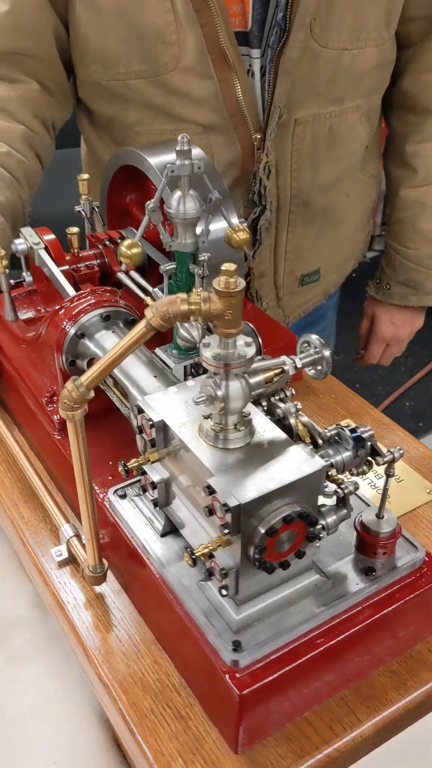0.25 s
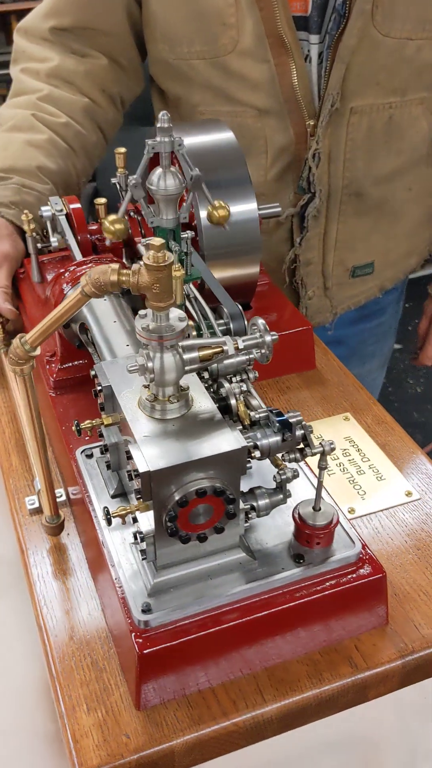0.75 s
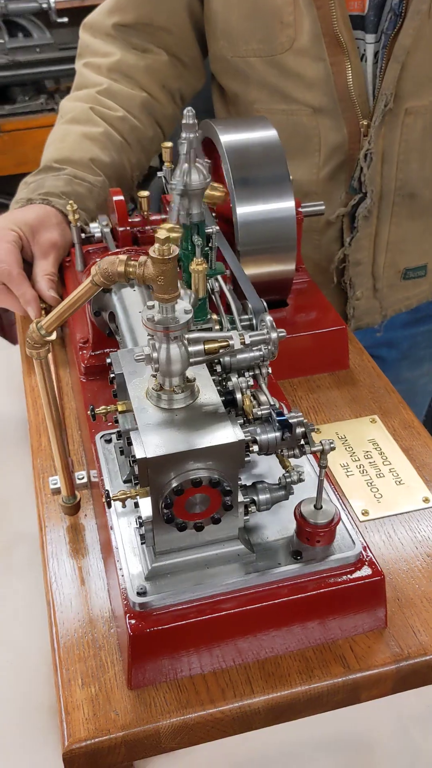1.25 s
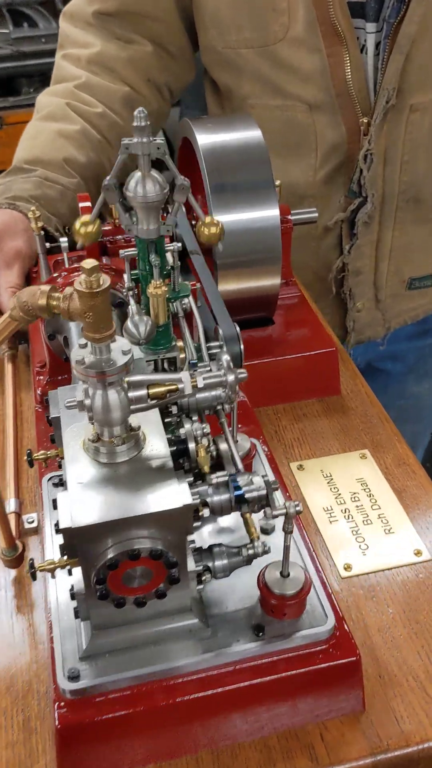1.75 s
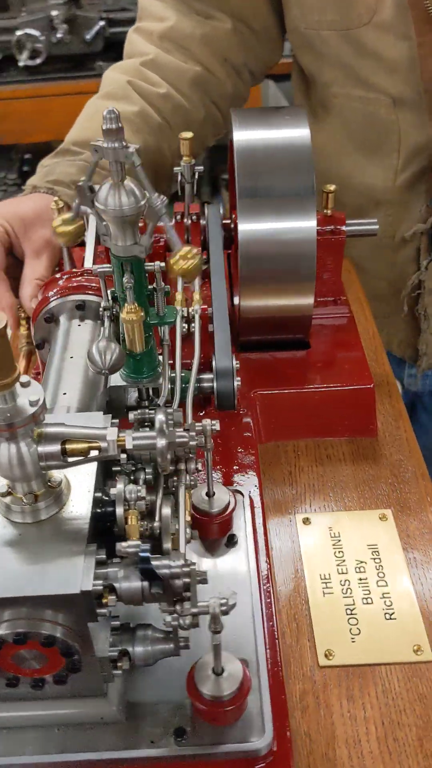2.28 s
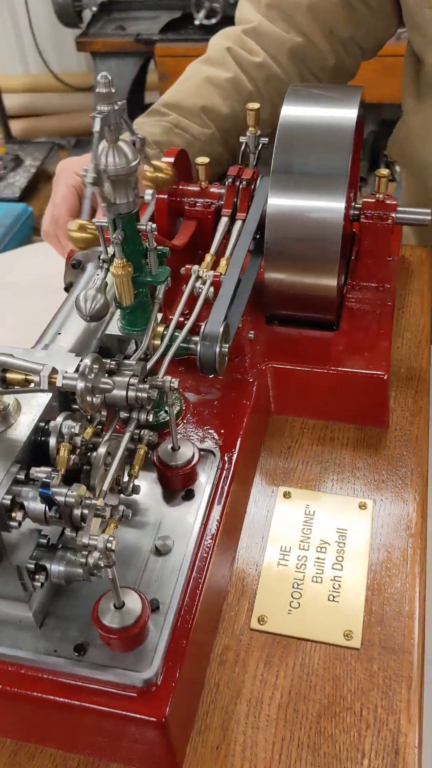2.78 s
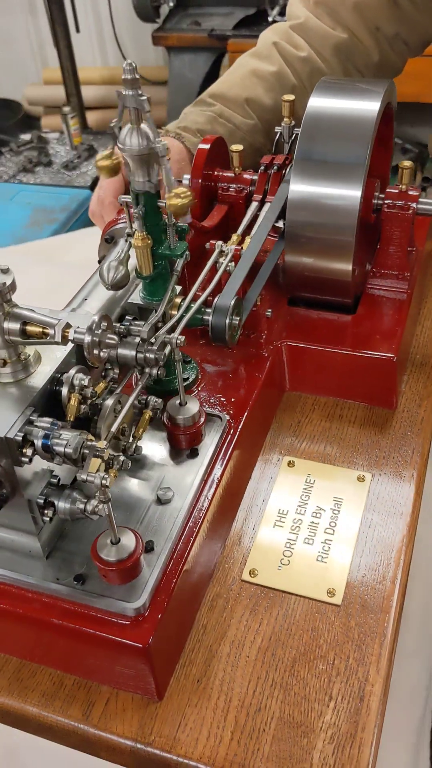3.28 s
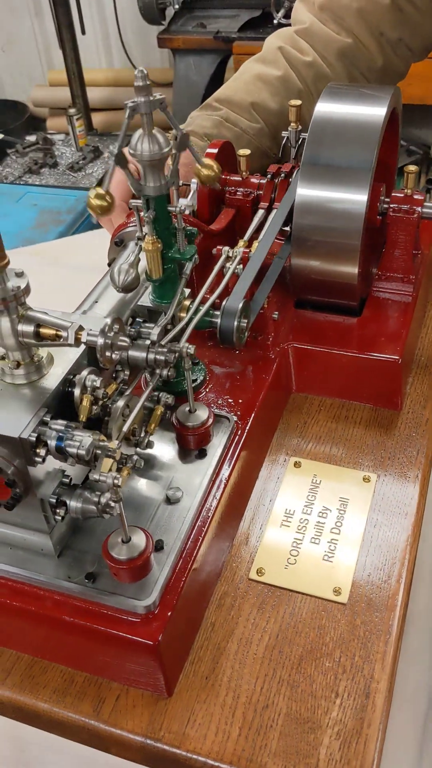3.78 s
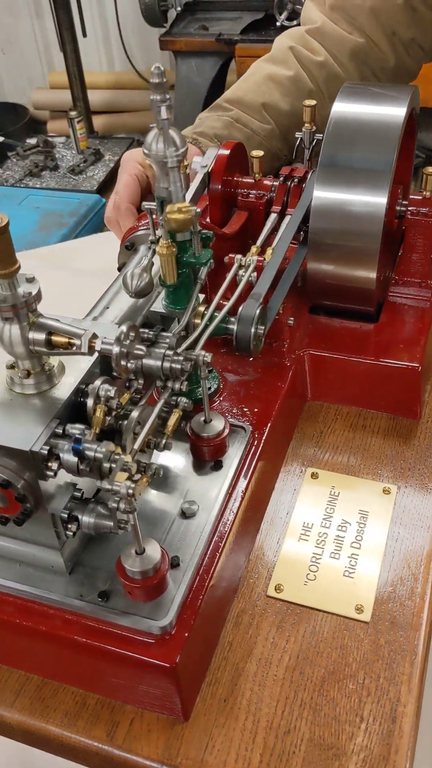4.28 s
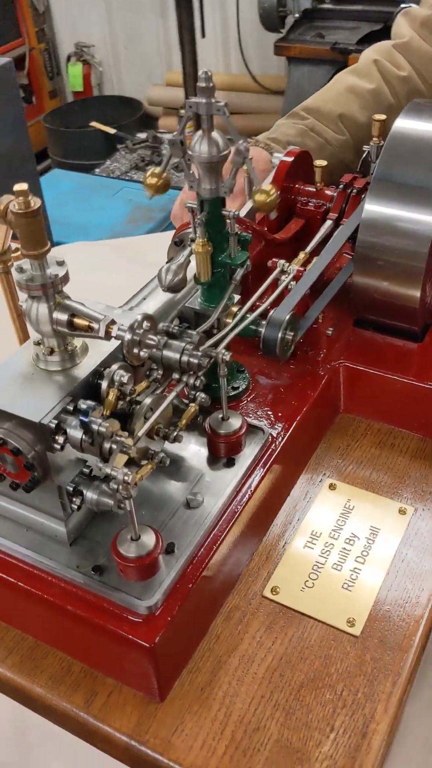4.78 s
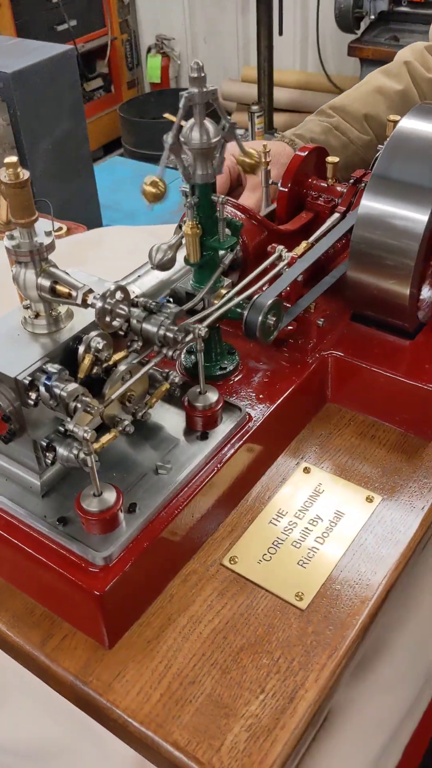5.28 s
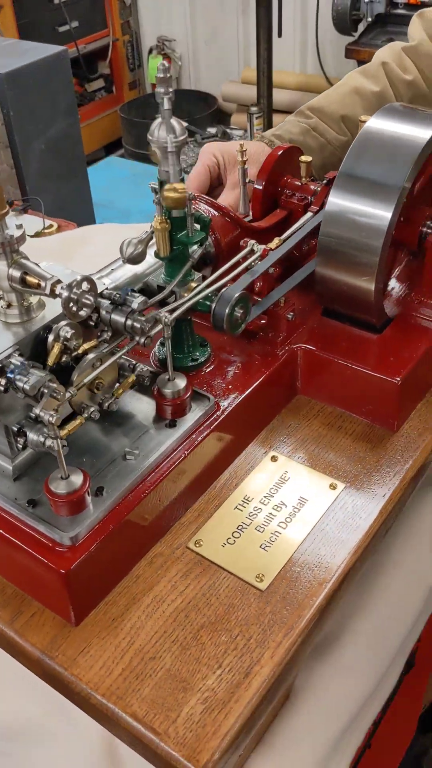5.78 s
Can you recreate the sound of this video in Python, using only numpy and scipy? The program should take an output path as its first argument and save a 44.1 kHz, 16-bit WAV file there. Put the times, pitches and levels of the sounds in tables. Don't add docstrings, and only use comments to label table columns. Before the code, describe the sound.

Heard close from a moving handheld phone, a miniature engine clicks and chuffs in a quick, slightly uneven beat. Sharp latch cracks rattle after closing, air spits through brass pipe, and the frame knocks lightly. Gear chatter runs throughout; linkage clatter and table drone grow as the phone comes round, with a faint motor hum emerging later in the short-echoing workshop.

```python
import sys
import numpy as np
from scipy import signal
from scipy.fft import rfft, irfft, next_fast_len
from scipy.io import wavfile
from scipy.ndimage import uniform_filter1d

SR = 44100
rng = np.random.default_rng(int(sys.argv[2]) if len(sys.argv) > 2 else 0)


def ratio_of_db(decibels):
    return 10 ** (np.asarray(decibels, float) / 20)


def transcribe(signal):
    frames = np.atleast_2d(signal).T
    limited = np.clip(frames, -1, 1)
    pcm = np.round(limited * 32767).astype(np.int16)
    wavfile.write(sys.argv[1], SR, pcm)


N = 266364
T = np.arange(N) / SR
SIDES = np.array([[1], [-1]])

# piston reversal in seconds, thump in dB,
# crank-end puff in dB, head-end puff in dB.
TURNS = [(0.08, -32, -33.5, -28.5), (0.515, -31, -37.5, -32.5), (0.966, -32, -34.5, -25),
         (1.385, -28.5, -32, -23.5), (1.771, -29, -31.5, -28), (2.151, -27, -36.5, -28.5),
         (2.537, -25, -38, -29), (2.933, -26, -33.5, -26), (3.336, -27, -32, -26),
         (3.743, -27.5, -33.5, -26), (4.154, -27.5, -32, -27.5), (4.567, -28, -34, -25.5),
         (4.981, -29, -32.5, -27.5), (5.398, -27, -32, -27.5), (5.813, -28.5, -34, -27.5)]
CRANK_LAG_S = 0.0099
# time in seconds, teeth passed.
TEETH = [(0.0, 0.94), (0.302, 13.13), (0.453, 18.86), (0.906, 35.35), (1.057, 41.04), (1.208, 47.1),
         (1.51, 59.9), (2.416, 99.63), (2.869, 119.09), (3.322, 137.98), (4.53, 187.48), (5.285, 217.76),
         (5.738, 236.29), (6.04, 248.32)]
# time in seconds, phone angle in degrees.
PHONE = [(0, 6.4), (.2, 18), (.5, 1.2), (.9, 18.5), (1.3, 23.3), (1.7, 27.6), (2.1, 28), (2.6, 45),
         (3.2, 66), (4, 69), (6.04, 50)]
GEAR_IN_VIEW_DEG = (3.3, 29)
# centre in Hz, width in Hz, level in dB.
JET = [(11610, 2600, -5.5), (12300, 460, 5.5), (13400, 1060, 2.5), (14900, 620, 0), (15500, 290, -8)]
# pitch in Hz, level in dB, t60 in seconds.
LATCH = [(11340, 3.5, 0.0018), (12670, 1, 0.0061), (14240, 9.5, 0.0028), (15900, -17, 0.0013)]
# pitch in Hz, level in dB, t60 in seconds.
VALVE = [(4550, -2.5, 0.0049), (5940, 3, 0.0084), (7480, 5.5, 0.004), (9200, 4, 0.0056)]
# pitch in Hz, level in dB, t60 in seconds.
DASHPOT = [(766, 4, 0.025), (1035, 4.5, 0.017), (1302, 2.5, 0.021), (1610, 8.5, 0.01), (1760, 7.5, 0.013),
           (1990, 0.5, 0.031), (2530, 1, 0.0076)]
# pitch in Hz, level in dB, t60 in seconds.
BASE = [(221, -8.5, 0.043), (288, -5.5, 0.067), (367, 3.5, 0.028), (456, 1.5, 0.039), (535.3, -0.5, 0.086)]
# pitch in Hz, level in dB, t60 in seconds.
FRAME = [(639, 1.5, 0.042), (712, -4, 0.04), (713.4, 2, 0.074), (785, -3.5, 0.067), (939.5, -8.5, 0.1),
         (1018, -4, 0.062), (1294, -4, 0.037), (1530, -3.5, 0.016), (1724, -12, 0.14), (2008, -3, 0.021),
         (2319, -11.5, 0.048), (2780, -15.5, 0.06)]


def unit(x):
    return x / np.sqrt(np.mean(x ** 2))


def band(x, hz, width):
    return signal.lfilter(*signal.iirpeak(min(hz, .45 * SR), hz / width, SR), x)


def walk(rate):
    k = int(SR / rate)
    held = np.repeat(rng.standard_normal(N // k + 1), k)
    return uniform_filter1d(held, k)[:N]


def noise_in(peaks, wander_db=0):
    jet = rng.standard_normal(N)
    out = np.zeros(N)
    for k, (hz, width, db) in enumerate(peaks):
        gain = ratio_of_db(db + wander_db * walk(5.5))
        out += (-1) ** k * gain * band(band(jet, hz, 2.0 * width), hz, 2.0 * width)
    return unit(out)


def strike(times, db, modes, scatter_db=5.0):
    at = (np.asarray(times) * SR).astype(int).clip(0, N - 1)
    chance = rng.standard_normal((len(at), len(modes)))
    out = np.zeros(N)
    for k, (hz, mode_db, t60) in enumerate(modes):
        blows = np.zeros(N)
        np.add.at(blows, at, ratio_of_db(db + mode_db + scatter_db * chance[:, k]))
        pole = np.exp(2j * np.pi * hz / SR - np.log(1000) / (max(t60, .001) * SR))
        out += (-1) ** k * signal.lfilter([1], [1, -pole], blows).imag
    return out / np.sqrt(len(modes))


def nearest(times, values):
    times = np.asarray(times)
    halfway = (times[1:] + times[:-1]) / 2
    return np.asarray(values)[np.searchsorted(halfway, T)]


def panned(x, db):
    return x * ratio_of_db(SIDES * db / 2)


def turned(s, span, ends):
    return np.interp(np.interp(s, *np.transpose(PHONE)), span, ends)


def facing(s):
    angle = np.interp(s, *np.transpose(PHONE))
    return np.exp(-.5 * ((angle - 38) / 10.7) ** 2)


def exhaust(s, db, modes, usual_db, low_db, high_db, jet_db, pan_db, gain_db,
            rise, fall, jet_lead, jet_fall, jet_shut, alike):
    age = T - nearest(s, s)

    def burst(age, fall):
        opening = np.abs(np.minimum(age, 0) / rise) ** 2.4
        bleeding = (np.hypot(np.maximum(age, 0), rise / 3) - rise / 3) / fall
        return np.exp(-opening - bleeding)

    def wide(peaks):
        shared = alike * noise_in(peaks, 2.6)
        return shared + np.sqrt(1 - alike ** 2) * SIDES * noise_in(peaks)

    def pipe_between(low_hz, high_hz):
        return wide([mode for mode in modes if low_hz <= mode[0] < high_hz])

    flow = burst(age, fall)
    jet_flow = burst(age + jet_lead, jet_fall) * np.exp(-np.maximum(age - jet_shut, 0) / 0.028)
    middle, low, high = pipe_between(3700, 6200), pipe_between(0, 3700), pipe_between(6200, SR)
    outer = ratio_of_db(low_db + 8.5 * facing(T)) * low + ratio_of_db(high_db) * high
    puff_db = nearest(s, db)
    effort = ratio_of_db(0.16 * (puff_db - usual_db))
    pipe = ratio_of_db(puff_db) * middle + effort * outer
    jet = effort * ratio_of_db(jet_db) * wide(JET)
    return panned((flow * pipe + jet_flow * jet) * ratio_of_db(gain_db), pan_db)


def puffs():
    # pitch in Hz, width in Hz, level in dB.
    pipe = [(3256, 150, -10), (3940, 160, -21), (4239, 23.4, -4.5), (4556, 83, -3.5), (5052, 94, 2),
            (5320, 27, -1), (6370, 100, -25), (6340, 28, -17.5), (6958, 92, -4.5), (7616, 20, -8.5),
            (8280, 400, -6.5), (8300, 15, -44), (9000, 28, -2), (9420, 70, -20.5), (9400, 71, -11),
            (10940, 81, -38)]
    # pitch in Hz, width in Hz, level in dB.
    crank_passage = [(4940, 27, 2), (5480, 230, -6), (5540, 120, -30)]
    s, _, crank_db, head_db = np.transpose(TURNS)
    head_tooth = 13.24 + 16.795 * np.arange(len(s))
    head_s = np.interp(head_tooth, *np.transpose(TEETH)[::-1])
    head = exhaust(head_s, head_db, pipe, usual_db=-27, low_db=-39.5, high_db=-27.7, jet_db=-46,
                   pan_db=-2, gain_db=0.48, rise=0.014, fall=0.0081, jet_lead=0.0066,
                   jet_fall=0.016, jet_shut=.045, alike=0.81)
    crank = exhaust(s + CRANK_LAG_S, crank_db, pipe + crank_passage, usual_db=-31.5, low_db=-46.5,
                    high_db=-35.5, jet_db=-42.7, pan_db=-3.5, gain_db=0.49, rise=0.0076, fall=0.019,
                    jet_lead=0.0038, jet_fall=0.085, jet_shut=.072, alike=0.86)
    return head + crank


def valves():
    # time in seconds, peak in dB, body ring in dB.
    snaps = [(0.1588, -18.5, -12.5), (0.3518, -20, -6), (0.599, -20.5, -16), (0.8076, -18, -11),
             (1.053, -19, -18), (1.2386, -19.5, -10.5), (1.4591, -17.5, -19), (1.6325, -18, -10),
             (1.8427, -18, -16.5), (2.0124, -15.5, -18), (2.2228, -16.5, -13), (2.395, -17.5, -10),
             (2.6095, -18, -8.5), (2.7871, -15.5, -9), (3.0071, -17, -10), (3.1885, -17.5, -8.5),
             (3.4121, -19, -12), (3.5951, -16.5, -6), (3.8197, -20.5, -7), (4.0043, -19.5, -4.5),
             (4.2301, -16, -14), (4.4157, -18, -5.5), (4.6444, -19, -10.5), (4.8317, -15.5, -10),
             (5.058, -16, -23), (5.246, -18, -9.5), (5.4751, -17.5, -16), (5.662, -19, -6.5),
             (5.891, -18.5, -16)]
    s, db, body_db = np.transpose(snaps)
    late = rng.uniform(0.66, 1.4, (len(s), 2))
    times = np.concatenate([s + .0006, s + .0036 * late[:, 0], s + .0065 * late[:, 1]])
    rebound_db = np.repeat([0, -11., -17.], len(s))
    latch_db = np.tile(db, 3) + rebound_db + 0.5
    latch = np.array([strike(times, latch_db, LATCH, 2.2) for _ in range(2)])
    body = strike(times + .0003, np.tile(db + body_db, 3) + rebound_db + 4.0, VALVE)
    pot_db = np.resize([-38, -32.5], len(s)) + turned(s, GEAR_IN_VIEW_DEG, (-3.5, 1.4))
    clatter = s[:, None] + np.linspace(-.013, .011, num=7) + .0012 * rng.standard_normal((len(s), 7))
    build_db = np.array([3.0, -0.5, 3.0, -0.5, 3.5, 2.0, -12.0])
    pot = strike(clatter.ravel(), (pot_db[:, None] + build_db).ravel() - 3.0, DASHPOT, 3.8)
    age = T - nearest(s, s)
    shaking = (age > 0) * np.exp(-np.abs(age) / 0.014) * ratio_of_db(nearest(s, db) - 29)
    rods = [(5270, 4460, 0), (8860, 4100, 0)]  # Hz, width Hz, dB
    rattle = shaking * np.array([noise_in(JET) + ratio_of_db(11.5) * noise_in(rods) for _ in range(2)])
    return panned(latch + rattle, -8.5 * facing(T) - 1.0) + body + pot


def thumps():
    s, db = np.transpose(TURNS)[:2]
    times = np.concatenate([s, s + 0.00831, s + .021])
    later_db = np.repeat([0, -9., -14.], len(s)) + 4.0
    frame_db = db + turned(s, GEAR_IN_VIEW_DEG, (-3.5, -1.7))
    base = strike(times, np.tile(db, 3) + later_db, BASE, 1.3)
    return base + strike(times - .003, np.tile(frame_db, 3) + later_db, FRAME, 2.9)


def governor():
    # pitch in Hz, level in dB, t60 in seconds.
    tooth_modes = [(692, -9.5, 0.017), (910, -2, 0.021), (1021, 3.5, 0.015), (1092.5, 3, 0.013),
                   (1805, -17, 0.031), (2230, -9.5, 0.0076)]
    s, teeth = np.transpose(TEETH)
    tooth = np.arange(1, teeth[-1])
    chance = rng.standard_normal((len(tooth), 4))
    entry = np.interp(tooth - .17, teeth, s) + .0006 * chance[:, 0]
    leave = np.interp(tooth + .14, teeth, s) + .001 * chance[:, 1]
    times = np.concatenate([entry, leave])
    db = np.concatenate([1.3 * chance[:, 2], 2 * chance[:, 3] - 6])
    reversal = np.transpose(TURNS)[0]
    since = times - reversal[(np.searchsorted(reversal, times) - 1).clip(0)]
    db = db + 4.1 * np.exp(-.5 * ((since - .07) / 0.067) ** 2)
    knock = unit(strike(times, db, tooth_modes, 1))
    knock = unit(uniform_filter1d(knock, size=9))
    ringing = unit(strike(times, db, FRAME, 1.53))
    links = rng.uniform(size=(1200, 3))
    shaken_tooth = links[:, 0] * teeth[-1] // 1 + .65 * links[:, 1] - .25
    shaken = np.interp(shaken_tooth, teeth, s)
    rattle = unit(strike(shaken, 12 * links[:, 2], FRAME + DASHPOT[2:] + BASE))
    knock = ratio_of_db(turned(T, (27, 153), (-43, -55.5))) * knock
    ringing = ratio_of_db(turned(T, GEAR_IN_VIEW_DEG, (-60.5, -46.5))) * ringing
    return knock + ringing + ratio_of_db(turned(T, GEAR_IN_VIEW_DEG, (-65.5, -47))) * rattle


def gland():
    s = np.transpose(TURNS)[0] + CRANK_LAG_S
    age = T - nearest(s, s)
    leak = np.exp(-.5 * ((age + .058) / .02) ** 2) * noise_in(JET) * ratio_of_db(-62)
    tick = strike(s + .15, -47., LATCH + VALVE)
    loose_link = strike([1.281], -34, VALVE + DASHPOT[3:], 1.3)
    return leak + tick + loose_link


def board():
    # pitch in Hz, width in Hz, level in dB.
    table_top = [(127, 33, -6), (208.8, 8.9, 3.5), (290.4, 47, -1)]
    return ratio_of_db(turned(T, (12, 35), (-69.5, -53.5))) * noise_in(table_top, 3.2)


def motor():
    # time in seconds, pitch in Hz, level in dB.
    hum = [(1.7, 137.4, -70), (2.3, 137.5, -70), (3.2, 137.5, -67), (3.86, 143.1, -61), (4.9, 140.3, -63),
           (5.1, 141.5, -56), (6.04, 140.5, -55)]
    s, hz, db = np.transpose(hum)
    phase = 2 * np.pi * np.cumsum(np.interp(T, s, hz)) / SR
    tone = np.sin(phase) + ratio_of_db(-2 + 3 * walk(9)) * np.sin(phase * 3 / 2)
    level_db = np.interp(T, s, db, left=-80.) + 1.7 * walk(7.7)
    return np.sqrt(2) * ratio_of_db(level_db) * tone


def shop():
    # frequency in Hz, level in dB per Hz.
    spectrum = [(28, -45), (40, -26.5), (55, -4), (75, -15.5), (160, -18.5), (290, -7.5), (443, -19),
                (900, -17.5), (3760, -29), (5160, -26.5), (6050, -26), (8530, -28.5), (10500, -43),
                (13700, -37)]
    at, per_hz = np.transpose(spectrum)
    out = 0
    for hz in 32 * 2 ** (np.arange(28) / 3):
        mid, side = (band(band(rng.standard_normal(N), hz, hz / 3), hz, hz / 3) for _ in range(2))
        db = np.interp(np.log(hz), np.log(at), per_hz)
        db = db + 3.7 * min(1, 1600.0 / hz) * walk(5) + 4.0 * walk(25)
        out = out + ratio_of_db(db) * (mid + min(0.087 + hz / 1230.0, 1) * side * SIDES)
    return unit(out) * ratio_of_db(-48)


def room(x, wet_db):
    # band centre in Hz, t60 in seconds.
    decay = [(150, 0.27), (700, 0.15), (2000, 0.41), (5000, 0.33), (12000, 0.14)]
    age = T[:SR // 2]
    tail = 0
    for hz, t60 in decay:
        mid, side = band(rng.standard_normal((2, len(age))), hz, 1.06 * hz)
        diffuse = unit(mid + min(hz / 790.0, 1) * side * SIDES)
        tail = tail + diffuse * np.exp(-np.log(1000) * age / t60)
    tail = tail * np.minimum(age / 0.0045, 1)
    tail = tail / np.sqrt((tail ** 2).sum(1, keepdims=True))
    return ratio_of_db(wet_db) * signal.fftconvolve(x.mean(0, keepdims=True), tail, axes=1)[:, :N]


def ports(x):
    # frequency in Hz, left minus right in dB.
    port_db = [(60, 3), (200, 2.5), (380, -3), (700, -8.5), (1290, 10), (2380, -4), (4400, 8), (8120, 7.5),
               (15000, -3)]
    # frequency in Hz, left lead in radians.
    port_lead = [(0, 0), (1030, -0.3), (2070, -1.5), (2410, 0.2), (2760, -0.6), (5000, 1.5), (5510, 0.7),
                 (6890, 7.8), (8440, 3.9), (9130, 6.6), (10400, 3.2), (11800, 0.1), (15800, 6.0),
                 (16400, 0.8)]
    size = next_fast_len(N + SR // 10)
    hz = np.arange(size // 2 + 1) * SR / size
    log_gain = np.interp(hz, *np.transpose(port_db)) * np.log(10) / 20
    ratio = log_gain + 1j * np.interp(hz, *np.transpose(port_lead))
    return irfft(rfft(x, size) * np.exp(SIDES * ratio / 2), size)[:, :N]


def scene():
    engine = puffs() + valves() + thumps() + governor() + gland()
    engine = signal.sosfilt(signal.butter(3, 190., "high", fs=SR, output="sos"), engine)
    return ports(engine) + room(engine, -11.0) + board() + motor() + shop()


def low_pass(x):
    return signal.sosfilt(signal.butter(12, 16820, fs=SR, output="sos"), x)


def record(dry):
    dry = dry - 0.14 * band(dry, 9940, 1160.0)
    top_cut = signal.ellip(6, .3, 36, 15900, fs=SR, output="sos")
    mix = signal.sosfilt(top_cut, dry)
    return low_pass(mix)


dry = scene()
out = record(dry)
transcribe(out)
```